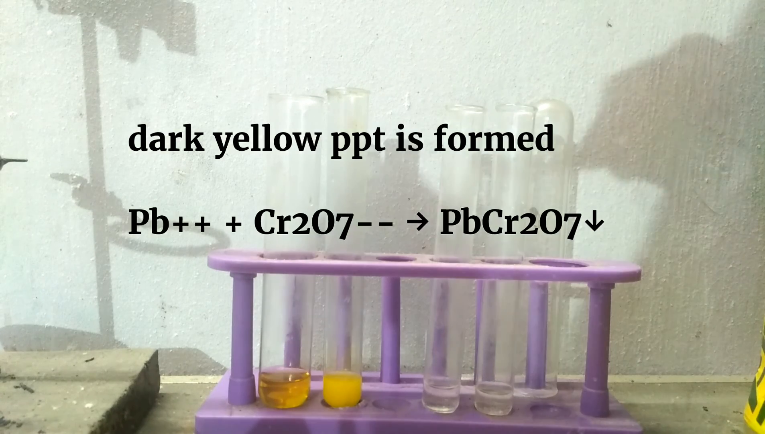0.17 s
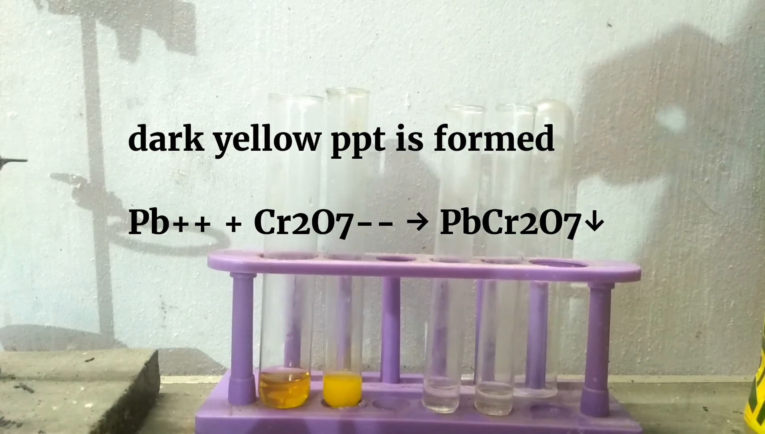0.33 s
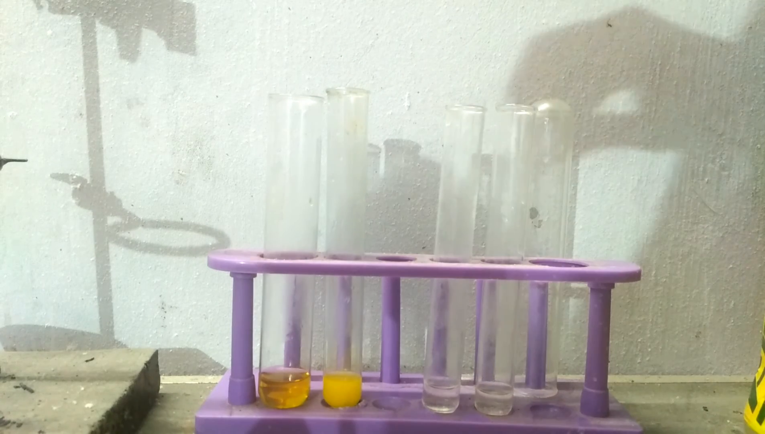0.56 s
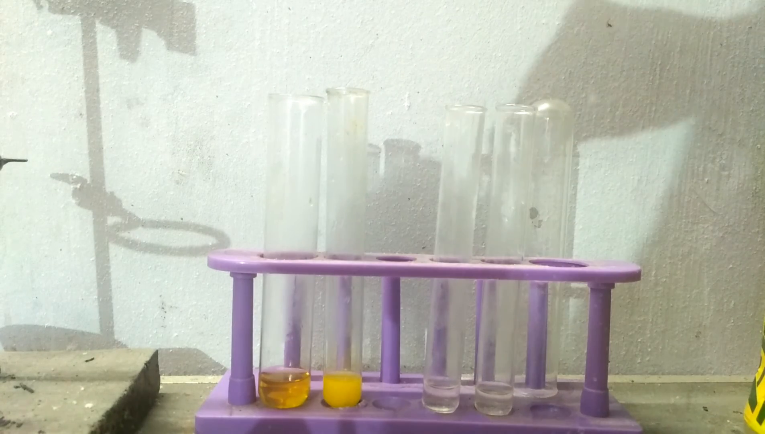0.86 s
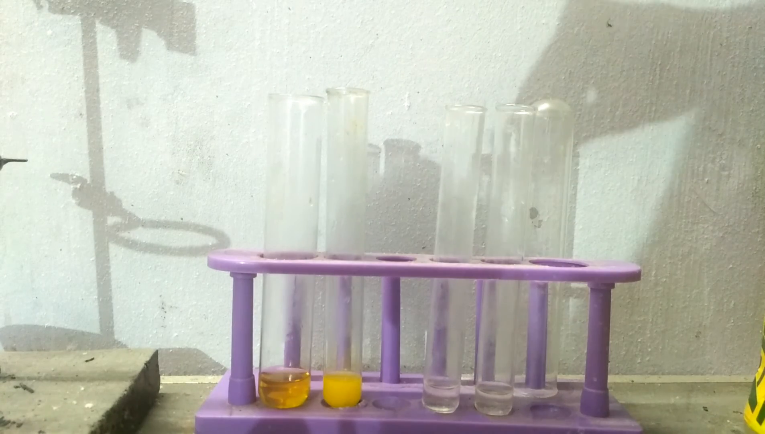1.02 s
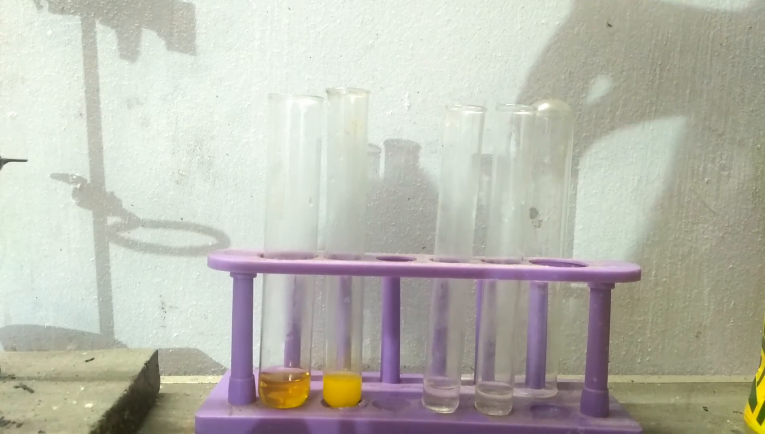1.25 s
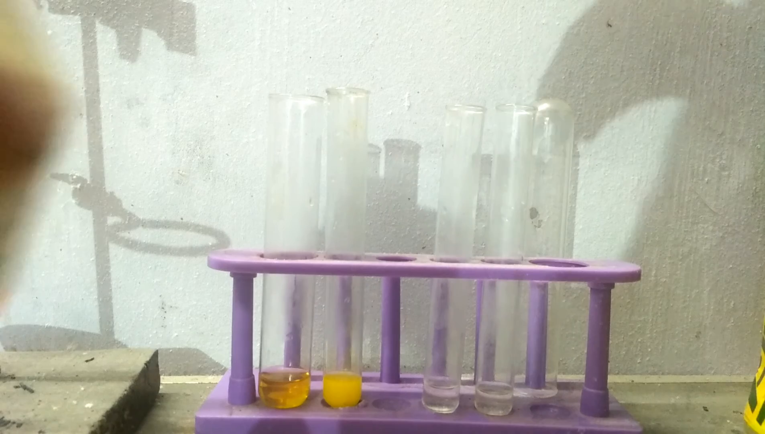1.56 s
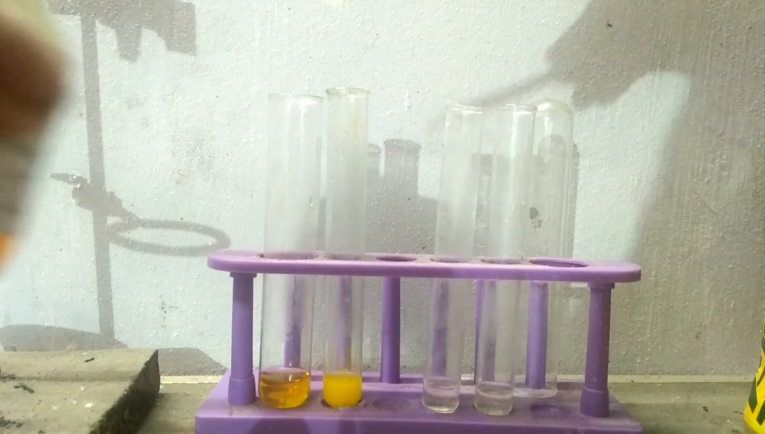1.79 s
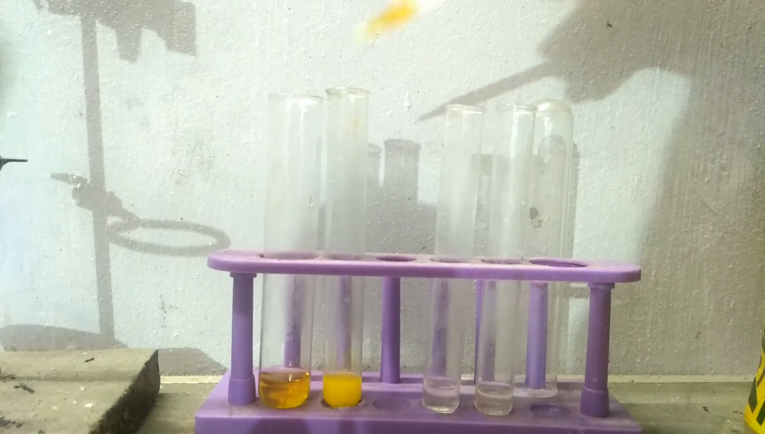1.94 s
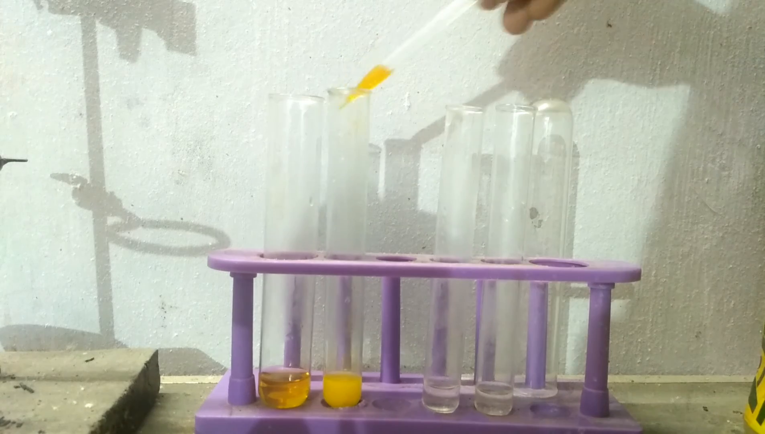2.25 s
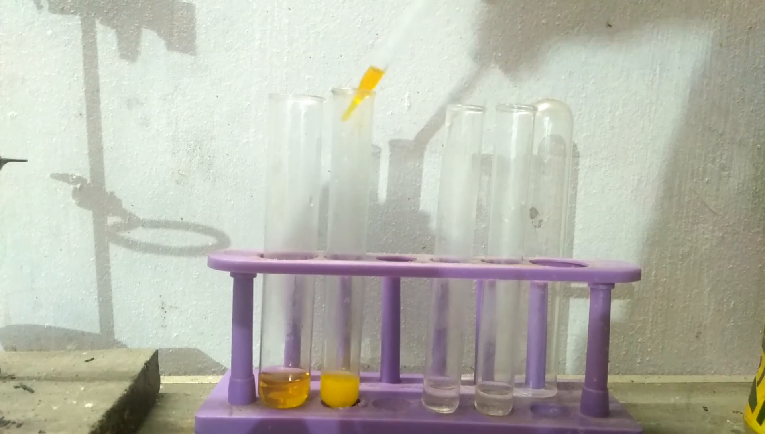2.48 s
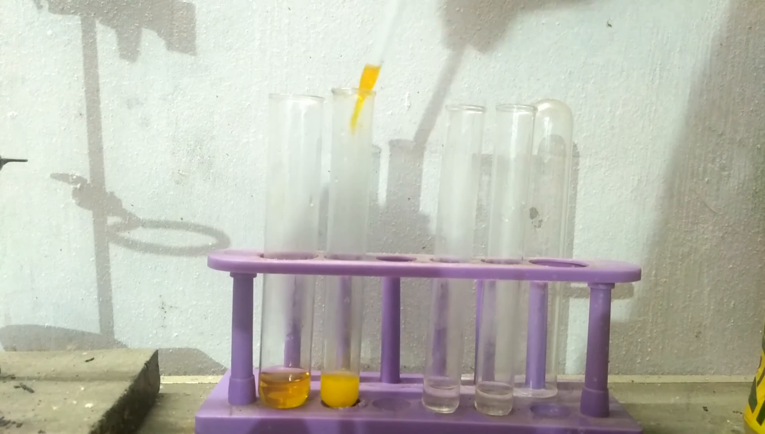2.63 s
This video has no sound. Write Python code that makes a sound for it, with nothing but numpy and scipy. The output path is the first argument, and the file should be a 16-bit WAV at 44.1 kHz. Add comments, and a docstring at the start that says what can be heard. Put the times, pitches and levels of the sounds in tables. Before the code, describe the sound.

Light dropper clinks on a glass test tube, following a sharp snap and small bottle clicks.

```python
"""A dry snap, then small ticks of a dropper bottle's loose neck under rustling fingers, and one rising
bubble. The dropper taps a glass test tube in a rack, bounces and scrapes along the rim; each tap cracks
and rings the tube, its neighbour and the air inside. The room is small and hard, with a short bright
tail. A machine hums low over the room's hiss."""
import sys
import numpy as np
from scipy import signal
from scipy.fft import rfft, irfft
from scipy.io import wavfile
from scipy.ndimage import uniform_filter1d

SR = 44100
rng = np.random.default_rng(int(sys.argv[2]) if len(sys.argv) > 2 else 0)


def pcm_store(signal):
    """Save signal as 16-bit PCM."""
    levels = np.round(np.clip(np.atleast_2d(signal), -1, 1) * 32767)
    wavfile.write(sys.argv[1], SR, levels.astype(np.int16).T)


N = 123479

# Dropper on tube. Each row: start in seconds, crack in dB, crack centre in Hz, ring in dB,
# ring tilt in dB per octave, main-mode offset in dB, neighbour tube in dB, air column in dB.
TUBE_TAPS = [(2.3299, -20, 10000, -13, 0, 0, -55, -59), (2.4065, -58, 2500, -70, 0, 0, -70, -85),
             (2.4075, -27, 10500, -46, 6, -4, -28, -61), (2.5675, -64, 9000, -51, 2, -2, -75, -85),
             (2.575, -54, 2800, -66, 2, -4, -75, -85), (2.585, -55, 5200, -47, 3, -6, -75, -85),
             (2.5965, -42, 12400, -49, 4, -8, -70, -85), (2.612, -62, 12500, -54, 2, -12, -80, -85),
             (2.648, -64, 12000, -55, 6, -8, -75, -85), (2.707, -78, 12000, -61, 7, -4, -80, -85),
             (2.747, -74, 5000, -66, 0, -3, -80, -85), (2.772, -78, 12000, -66, 3, 0, -80, -85)]
# Tube glass modes. Each entry: frequency in Hz.
TUBE_MODE_HZ = [4636, 4720, 8199, 8190, 9302, 9392, 9508, 11470, 11577, 11620, 11790, 12590, 13215, 13630,
                15160, 15150]
# Same modes, same order. Each row: level in dB, T60 in seconds.
TUBE_MODE_DB_T60 = [(-12, 0.065), (-18.5, 0.21), (-7.5, 0.093), (-19.5, 0.26), (-13.5, 0.106), (-9.5, 0.31),
                    (-35.5, .1), (-9.5, 0.19), (7.5, 0.095), (-9.5, .16), (-13, 0.052), (-12.5, 0.044),
                    (-30, 0.14), (-38.5, .18), (-2, 0.043), (-16.5, 0.25)]
# Glass modes of neighbour tube and bottle. Each row: frequency in Hz, level in dB, T60 in seconds.
NEIGHBOUR_MODES = [(7607, -4, .075), (8250, 2, .022), (9500, -2, .015), (11600, 8, .015), (12590, -16, .08)]
BOTTLE_MODES = [(3900, -11, .011), (4740, -10, .011), (9850, 0, .015), (10080, -4, .025), (12250, -2, .013),
                (12470, -4, .02), (15600, -18, .025)]
# Air modes in the tube. Each row: frequency in Hz, level in dB.
COLUMN_MODES = [(625, -3.5), (709, -13.5), (559, -13)]
# Bottle neck. Each row: start in seconds, crack in dB, crack centre in Hz, crack width in octaves,
# ring in dB, ring tilt in dB per octave.
NECK_TICKS = [(0.537, -52, 12800, 0.15, -79, 3), (0.558, -53, 13000, 0.19, -74, -5),
              (.652, -64.5, 5500, 0.44, -61.5, 19), (.697, -72, 12100, 0.19, -77, 6),
              (0.71, -69, 5500, 0.17, -65, 17), (.735, -66, 11400, 0.38, -66, 14),
              (0.779, -63, 10300, 0.17, -68, 0), (0.963, -43.5, 5370, 0.51, -57, 30),
              (1.2856, -30, 6300, 1, -26.5, -6), (1.2928, -30.5, 5200, 1, -34, -7),
              (1.2971, -35, 3900, 1, -49, 0), (1.2995, -55, 5960, 0.53, -27, 0.5)]
# Opening snap. Each row: start in seconds, peak in dB.
SNAPS = [(.4008, -5)]
# Friction envelopes: dropper on rim, fingers on bottle. Each row: time in seconds, level in dB.
SCRAPE_ENVELOPE = [(2.554, -82), (2.575, -58.5), (2.6, -73), (2.651, -67), (2.67, -78), (2.69, -87),
                   (2.8, -89)]
RUSTLE_ENVELOPE = [(.6, -80), (.66, -82), (.72, -67), (.76, -78), (.86, -81), (.95, -81), (1.0, -73),
                   (1.1, -97)]
# Noise spectra. Each row: frequency in Hz, relative density in dB.
SNAP_SPECTRUM = [(900, -84.5), (1800, -62), (3000, -29), (4800, -22.5), (6000, -26.5), (8300, -12.5),
                 (11500, -8.5), (13600, 4.5), (15900, -12)]
SCRAPE_SPECTRUM = [(880, -36), (1500, -13), (3970, -20.5), (6890, 4), (9600, -27), (10600, -36), (12500, 5),
                   (15700, -8.5), (16500, -18)]
RUSTLE_SPECTRUM = [(3000, -44), (8500, -23), (10200, -9), (11200, -17), (12300, -4), (14300, -12),
                   (15600, -1), (16500, -4)]
HISS_SPECTRUM = [(15, -40), (28, -24.5), (45, 1.5), (60, -9), (79, -15.5), (110, -6.5), (260, -17),
                 (340, -23), (450, -26.5), (670, -28.5), (1060, -32), (2000, -34), (3500, -43),
                 (5400, -48.5), (6500, -47), (7100, -39), (7800, -48.5), (9000, -49), (13300, -43),
                 (15200, -45.5), (16500, -73)]
# Early reflections of the snap. Each row: delay in seconds, gain in dB.
SNAP_ECHOES = [(.0011, -7), (.0026, -15), (.0058, -21), (.0092, -18), (.0163, -24)]
# Room decay. Each row: frequency in Hz, T60 in seconds.
ROOM_DECAY = [(500, 0.13), (2500, 0.18), (4000, 0.14), (5500, 0.33), (7200, 0.26), (9000, 0.18),
              (11000, 0.23), (13500, 0.2), (16000, 0.18)]
# Machine hum lines. Each row: frequency in Hz, steady RMS level in dB, waver as a fraction.
HUM_LINES = [(64.2, -59, 0.11), (96.5, -72.5, 0.86), (125.8, -72.5, 0.14), (146, -73, 0.46),
             (190, -69.5, 0.12), (221.3, -81.5, 0.19), (254.4, -73.5, .15), (383, -88.5, 0.58),
             (444.5, -86.5, 0.45)]


def tube_taps():
    """Each tap cracks and rings the tube and its neighbour; the air inside answers softly."""
    cracks, rings, air = np.zeros((3, N))
    t = np.arange(SR // 2) / SR
    column_rise_s, column_t60_s = .011, .11
    column = sum(amp(db) * np.sin(2 * np.pi * hz * t) for hz, db in COLUMN_MODES)
    column *= (1 - np.exp(-t / column_rise_s)) ** 2 * amp(-60 * t / column_t60_s)
    rest_s, mute_s, mute_db = .0155, .002, -7  # the tip comes to rest and mutes the glass
    mute = amp(mute_db * np.clip((t - rest_s) / mute_s, 0, 1))
    for start_s, crack_db, crack_hz, ring_db, tilt_db, main_db, neighbour_db, air_db in TUBE_TAPS:
        add(cracks, start_s, crack(crack_db, crack_hz, width_octaves=.55))
        modes = [(hz, db + (main_db if 11000 < hz < 12000 else 0), t60_s)
                 for hz, (db, t60_s) in zip(TUBE_MODE_HZ, TUBE_MODE_DB_T60)]
        add(rings, start_s, mute * glass_ring(modes, ring_db, tilt_db))
        add(rings, start_s, glass_ring(NEIGHBOUR_MODES, neighbour_db))
        add(air, start_s, amp(air_db) * column / column.max())
    return radiate(cracks, cutoff_hz=2070), radiate(rings, cutoff_hz=2070), air


def snap():
    """Dry, bright click with a faint puff of noise."""
    out = np.zeros(N)
    for start_s, peak_db in SNAPS:
        add(out, start_s, burst(lambda hz: curve_at(SNAP_SPECTRUM, hz), peak_db, t60_s=.006, puff=.14))
    return out


def bottle_ticks(rattle_t60_s=.005):
    """The neck ticks; its loose fit rattles briefly and blurs the ring."""
    out, t = np.zeros(N), np.arange(1024) / SR
    for start_s, crack_db, crack_hz, width_octaves, ring_db, tilt_db in NECK_TICKS:
        rattle = rng.standard_normal(len(t)) * amp(-60 * t / rattle_t60_s)
        add(out, start_s, crack(crack_db, crack_hz, width_octaves))
        ring = glass_ring(BOTTLE_MODES, ring_db, tilt_db)
        add(out, start_s, signal.oaconvolve(ring, rattle / np.linalg.norm(rattle)))
    return radiate(out, cutoff_hz=1480)


def friction(envelope, spectrum, slips_per_s):
    """Tiny uneven slips of one surface on another."""
    sizes = amp(3 * np.minimum(rng.exponential(1, N), 4))
    slips = sizes * (rng.random(N) < slips_per_s / SR) * rng.choice([-1, 1], N)
    noise = colour(slips, lambda hz: curve_at(spectrum, hz))
    level_db = np.interp(np.arange(N) / SR, *np.transpose(envelope), left=-200, right=-200)
    return noise / noise.std() * amp(level_db)


def bubble(start_s=1.048, level_db=-48.5, start_hz=1050, glide_hz_per_s=10300, rise_s=.0049, t60_s=.07):
    """One bubble: a damped sine rising in pitch."""
    out, t = np.zeros(N), np.arange(4000) / SR
    cycles = start_hz * t + .5 * glide_hz_per_s * t ** 2
    envelope = (1 - np.exp(-t / rise_s)) * amp(level_db - 60 * t / t60_s)
    add(out, start_s, envelope * np.sin(2 * np.pi * cycles))
    return out


def glass_ring(modes, strike_db, tilt_db_per_octave=0, spread_db=1, contact_s=.0004):
    """Decaying glass modes; each blow excites them a little differently."""
    t = np.arange(SR // 2) / SR
    hz, mode_db, t60_s = np.transpose(modes)[:, :, None]
    level_db = mode_db + strike_db + tilt_db_per_octave * np.log2(hz / 10000)
    level_db += spread_db * rng.standard_normal(hz.shape)
    attack = np.sin(np.pi / 2 * np.minimum(t / contact_s, 1)) ** 2
    partials = amp(level_db - 60 * t / t60_s) * np.sin(2 * np.pi * hz * t)
    return .5 * attack * partials.sum(0)


def crack(peak_db, centre_hz, width_octaves):
    """Contact noise in one band, 6 dB down at width_octaves from the centre."""
    return burst(lambda hz: -6 * (np.log2((hz + 1) / centre_hz) / width_octaves) ** 2,
                 peak_db, t60_s=.008)


def burst(gain_db_at, peak_db, t60_s, puff=1.0):
    """Coloured click trailing fast-dying noise."""
    t = np.arange(2048) / SR
    pulse = puff * rng.standard_normal(len(t)) * amp(-60 * t / t60_s)
    pulse[0] = 2  # the click
    pulse = colour(pulse, gain_db_at)
    return amp(peak_db) * pulse / abs(pulse).max()


def radiate(sound, cutoff_hz):
    """Small bodies radiate little bass."""
    return signal.sosfilt(signal.butter(4, cutoff_hz, "high", fs=SR, output="sos"), sound)


def with_echoes(sound):
    """Direct sound plus early reflections."""
    out = sound.copy()
    for delay_s, gain_db in SNAP_ECHOES:
        add(out, delay_s, amp(gain_db) * sound)
    return out


def room_tail(sound, slot_samples=20):
    """Sparse reflections of random sign; decay time varies with frequency."""
    reflections = np.zeros(SR // 2)
    slots = np.arange(100, len(reflections) - slot_samples, slot_samples)
    signs = rng.choice([-1., 1.], len(slots))
    reflections[slots + rng.integers(0, slot_samples, len(slots))] = signs
    hz, t, bands = signal.stft(reflections, SR, nperseg=128)
    decay = amp(-60 * t / curve_at(ROOM_DECAY, hz)[:, None])
    tail = signal.istft(bands * decay, SR, nperseg=128)[1]
    return signal.fftconvolve(sound, tail / np.linalg.norm(tail))[:N]


def room_hiss(level_db=-64):
    """Steady noise, strongest in the bass."""
    hz = np.fft.rfftfreq(N, 1 / SR)
    noise = irfft(rfft(rng.standard_normal(N)) * amp(curve_at(HISS_SPECTRUM, hz)), N)
    return amp(level_db) * noise / noise.std()


def machine_hum(smoothing_s=.03):
    """Low tones, each wavering in level and phase."""
    out, t = np.zeros(N), np.arange(N) / SR
    window = int(smoothing_s * SR)
    for hz, db, waver in HUM_LINES:
        drift = uniform_filter1d(uniform_filter1d(rng.standard_normal((2, N)), window), window)
        drift = waver * drift / drift.std()
        carrier = np.exp(2j * np.pi * (hz * t + rng.random()))
        out += np.sqrt(2) * amp(db) * ((1 + drift[0] + 1j * drift[1]) * carrier).real
    return out


def amp(db):
    return 10 ** (np.asarray(db) / 20)


def curve_at(points, hz):
    """Interpolate over log frequency."""
    point_hz, values = np.transpose(points)
    return np.interp(np.log(hz + 1), np.log(point_hz + 1), values)


def add(mix, start_s, sound):
    part = mix[round(start_s * SR):][:len(sound)]
    part += sound[:len(part)]


def colour(sound, gain_db_at):
    """Minimum-phase filter with gain gain_db_at(hz)."""
    hz = np.abs(np.fft.fftfreq(2048, 1 / SR))
    log_gain = np.log(amp(np.maximum(gain_db_at(hz), -90)))
    phase = -signal.hilbert(log_gain).imag
    impulse = np.fft.ifft(np.exp(log_gain + 1j * phase)).real[:1024]
    return signal.oaconvolve(sound, impulse)[:len(sound)]


def scene():
    """Mono mix of sources, room tail and background."""
    click = snap()
    bottle = bottle_ticks() + friction(RUSTLE_ENVELOPE, RUSTLE_SPECTRUM, slips_per_s=2500)
    cracks, rings, air = tube_taps()
    contacts = cracks + friction(SCRAPE_ENVELOPE, SCRAPE_SPECTRUM, slips_per_s=4000)
    tail = room_tail(amp(-5) * (click + bottle) + amp(.5) * contacts + amp(-13) * rings)
    sources = with_echoes(click) + bottle + contacts + rings + air + bubble()
    return (sources + tail + room_hiss() + machine_hum())[None]


def record(dry):
    """One microphone port resonance, then the band limit."""
    port_hz, port_width_hz, port_mix_db, limit_hz = 7030, 900, -7, 16000
    b, a = signal.iirpeak(port_hz, port_hz / port_width_hz, SR)
    ported = dry + amp(port_mix_db) * signal.lfilter(b, a, dry)
    lowpass = signal.firwin(181, limit_hz, window=("kaiser", 9), fs=SR)
    return signal.oaconvolve(ported, lowpass[None], "same")


dry = scene()
out = record(dry)
pcm_store(out)
```